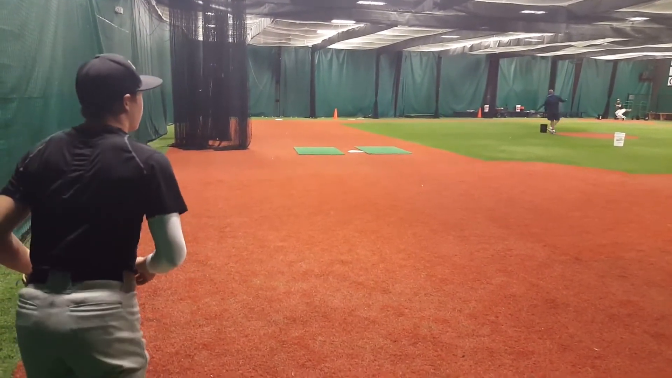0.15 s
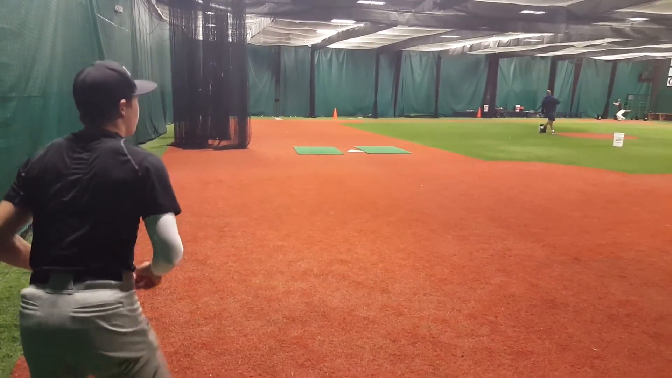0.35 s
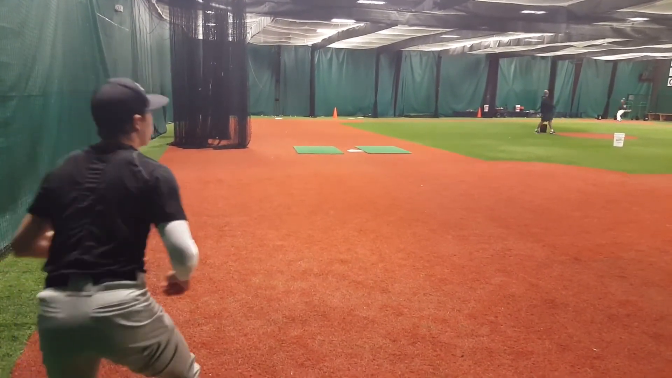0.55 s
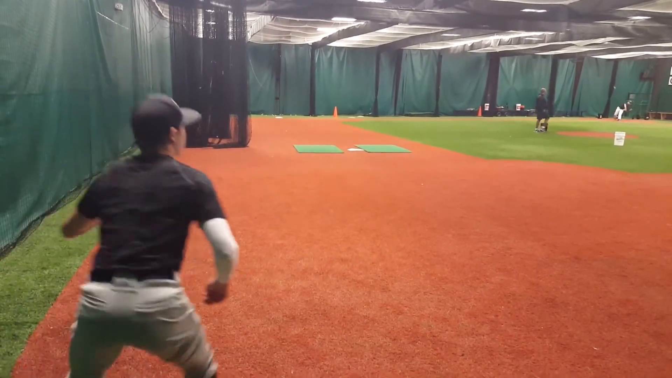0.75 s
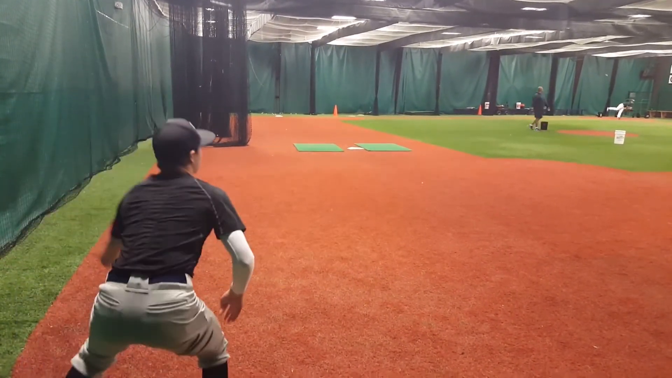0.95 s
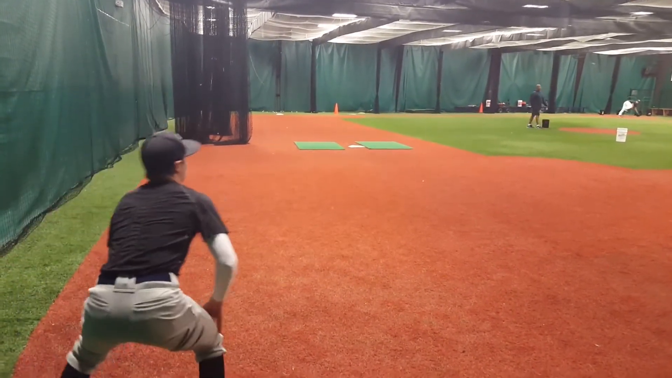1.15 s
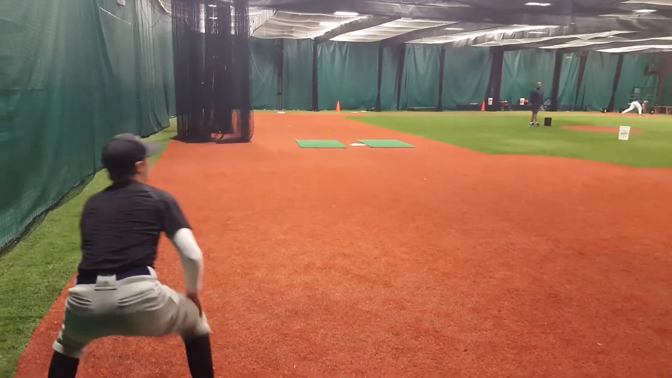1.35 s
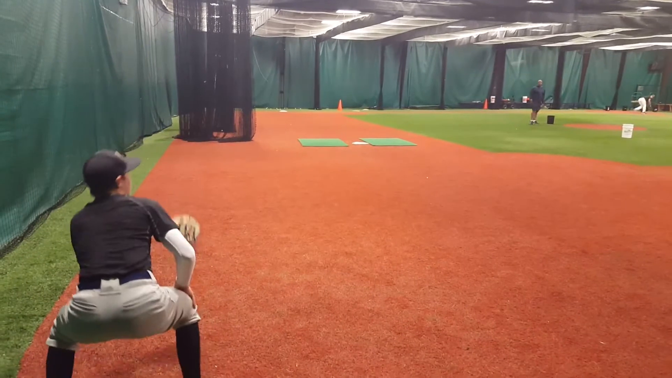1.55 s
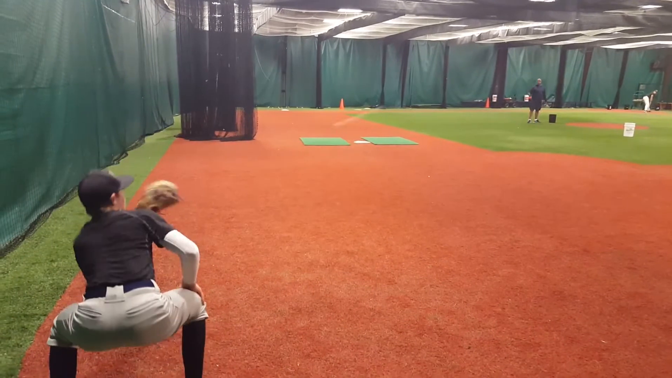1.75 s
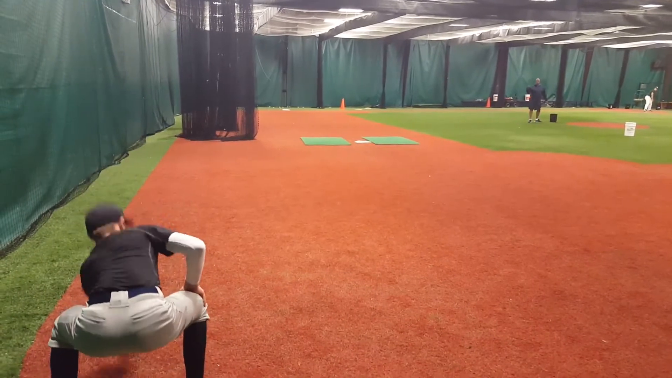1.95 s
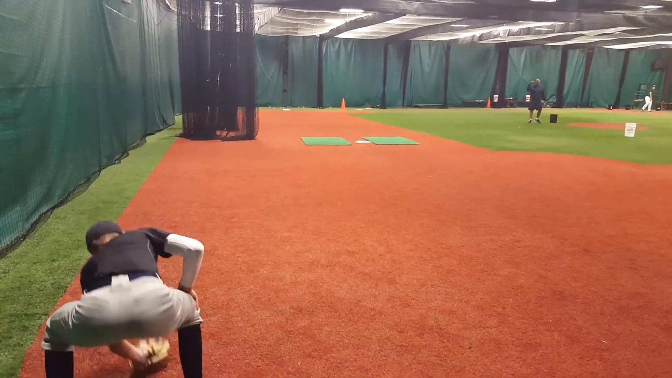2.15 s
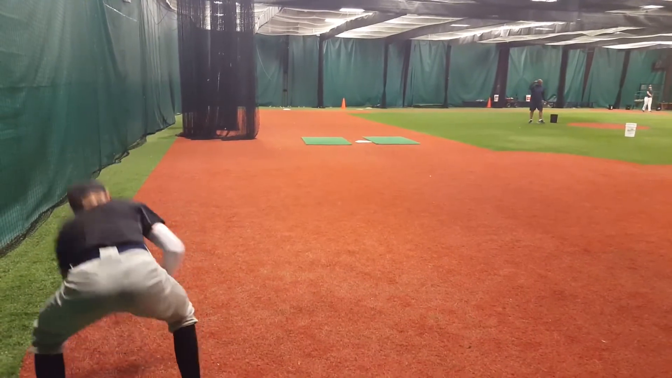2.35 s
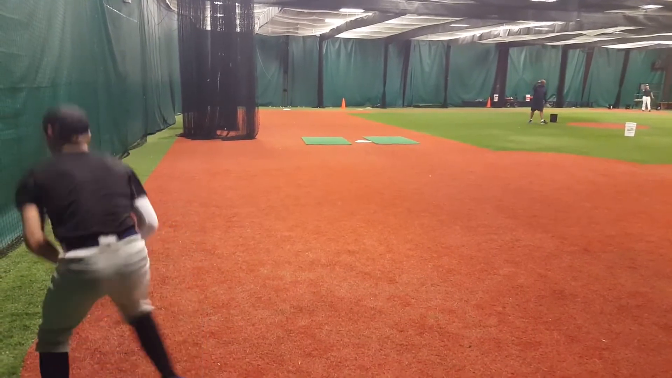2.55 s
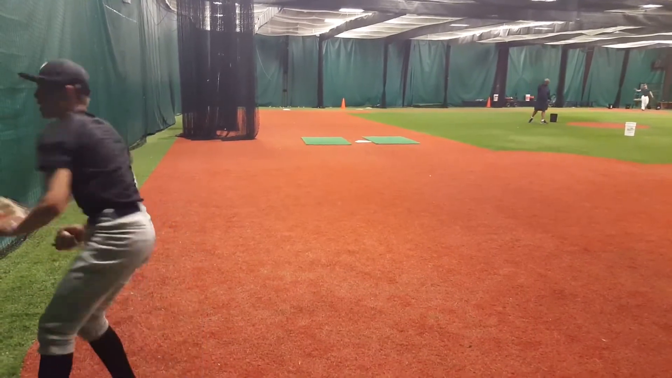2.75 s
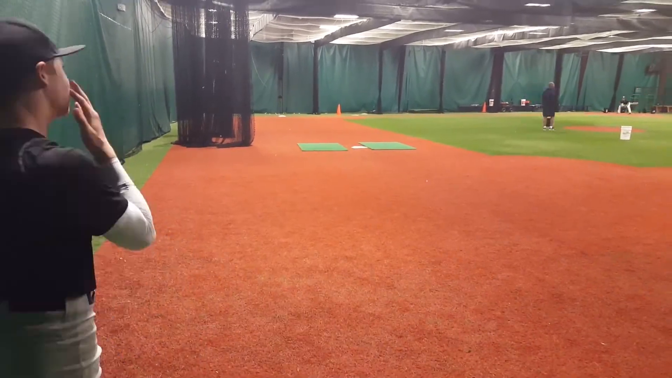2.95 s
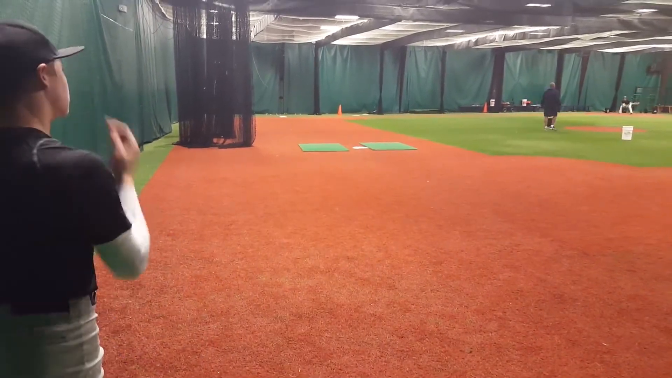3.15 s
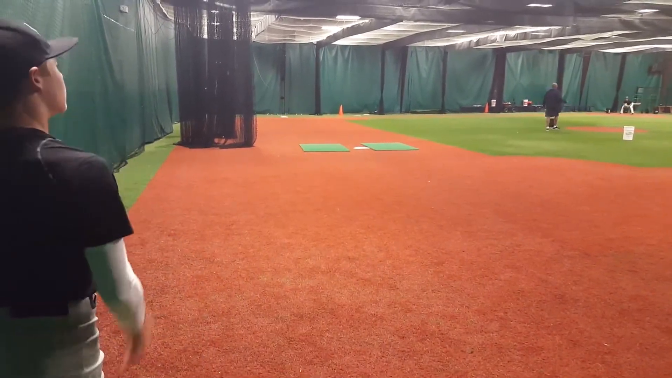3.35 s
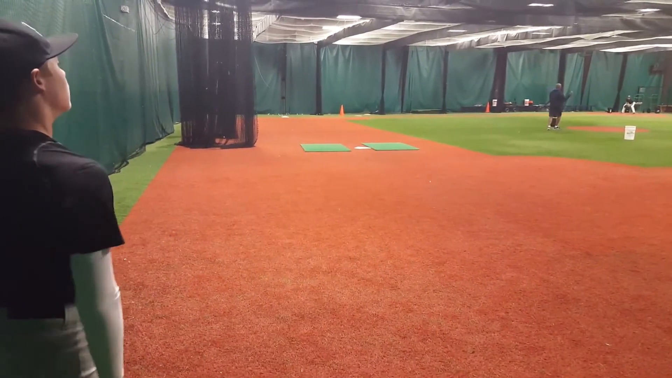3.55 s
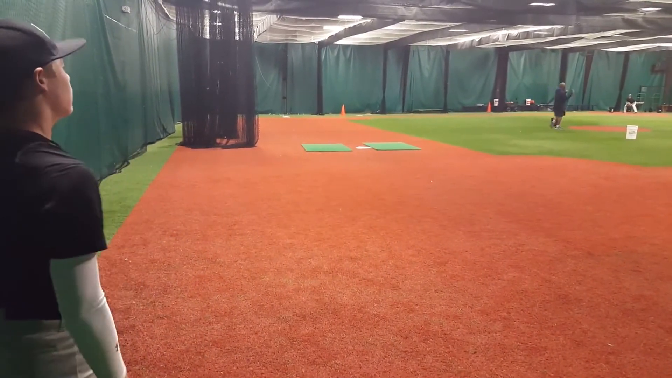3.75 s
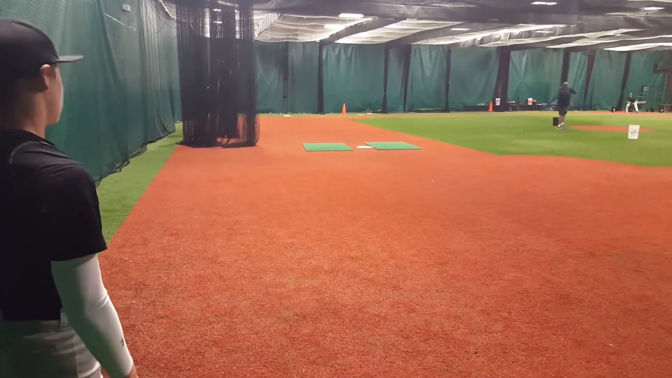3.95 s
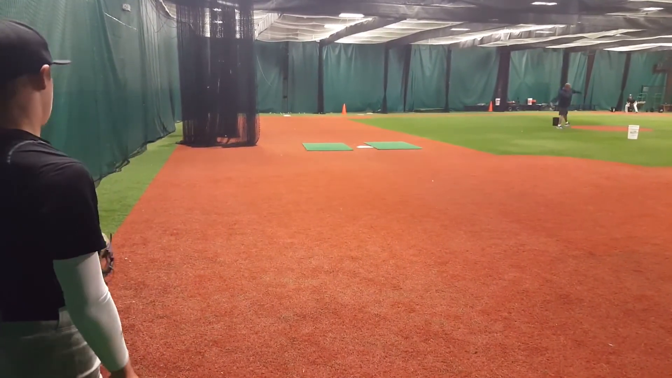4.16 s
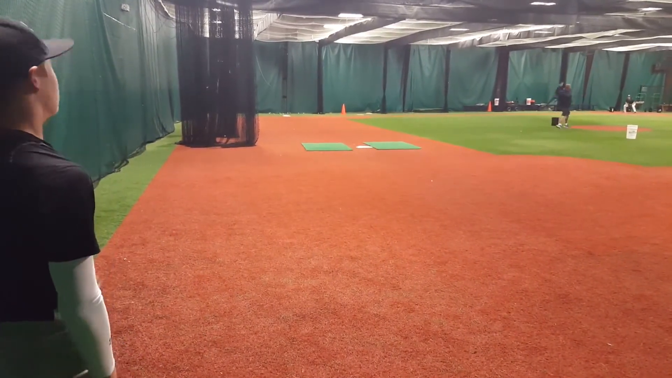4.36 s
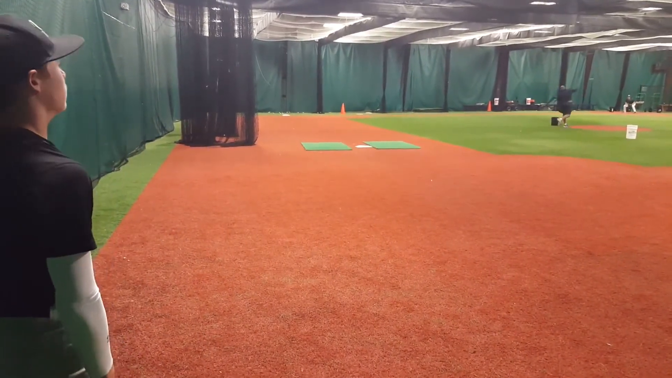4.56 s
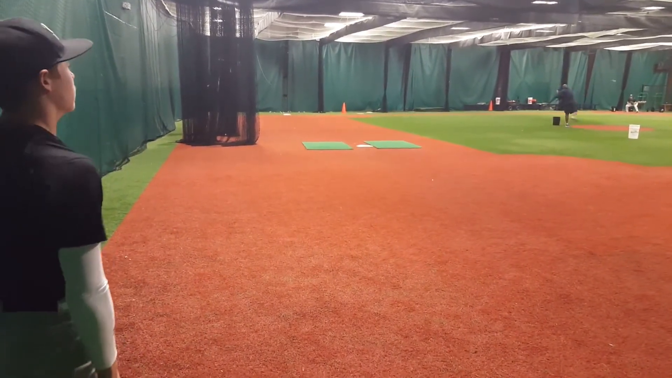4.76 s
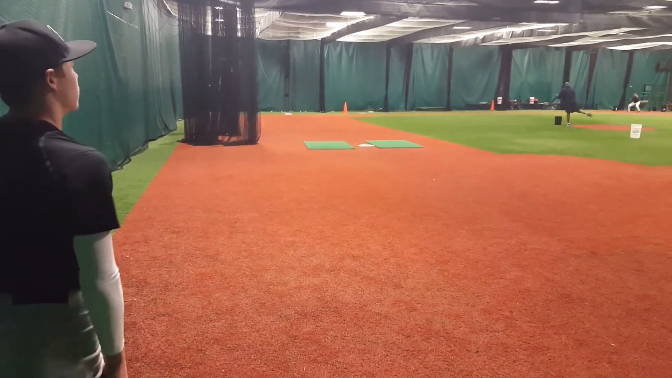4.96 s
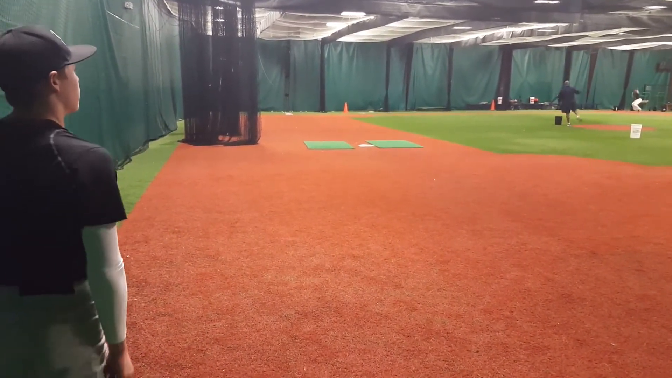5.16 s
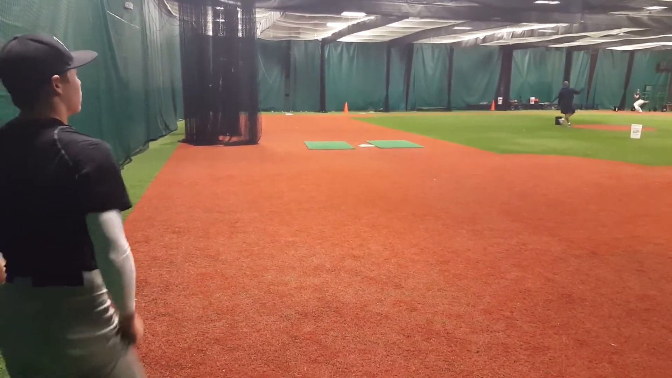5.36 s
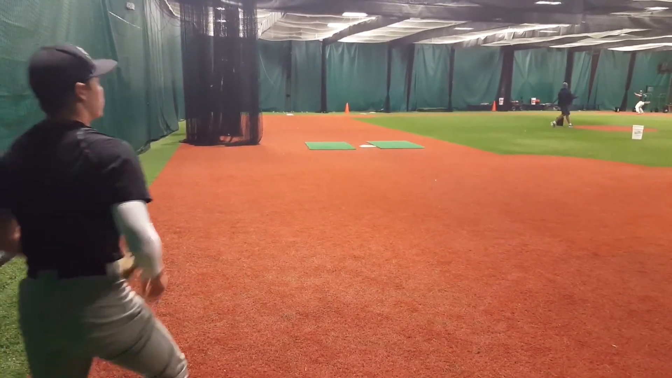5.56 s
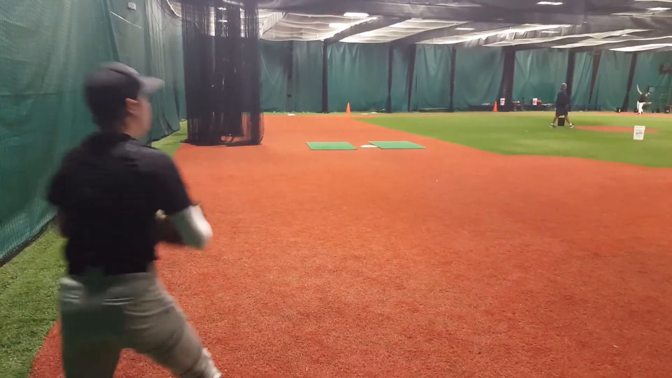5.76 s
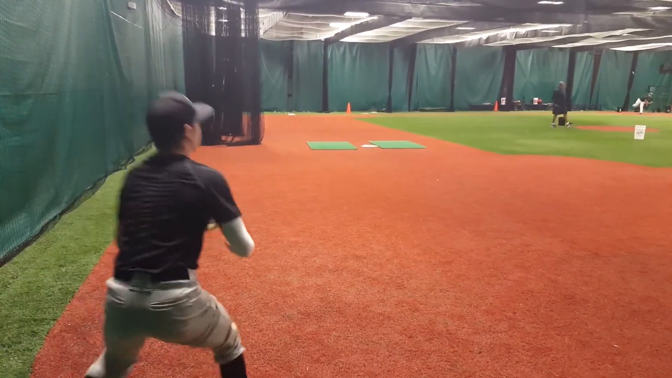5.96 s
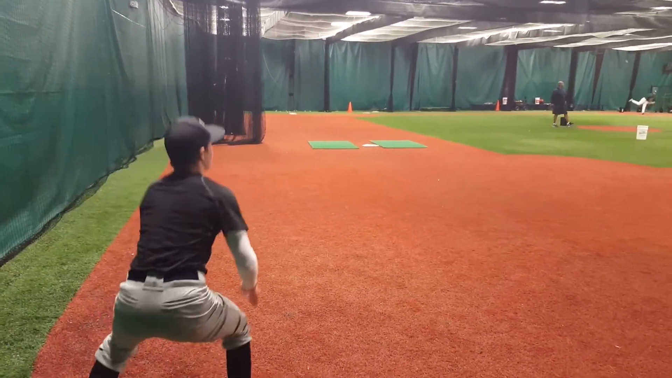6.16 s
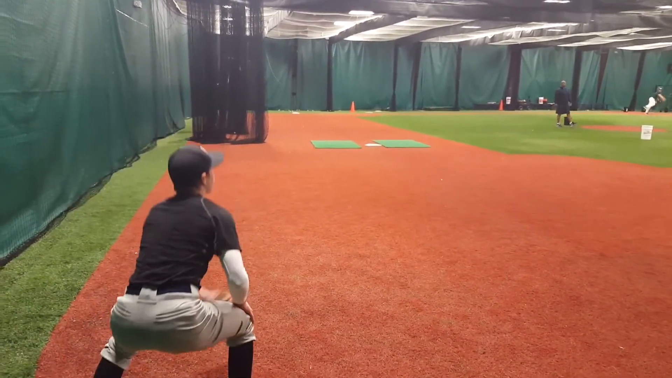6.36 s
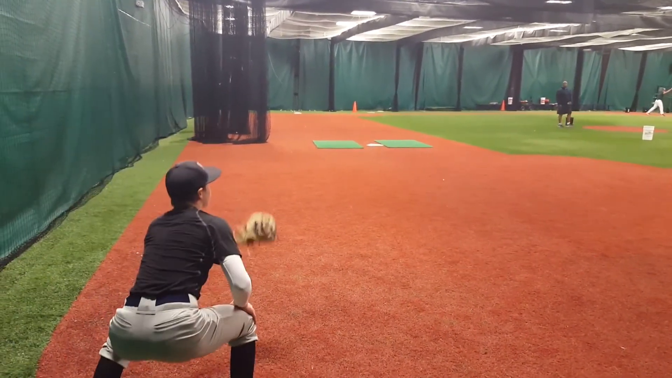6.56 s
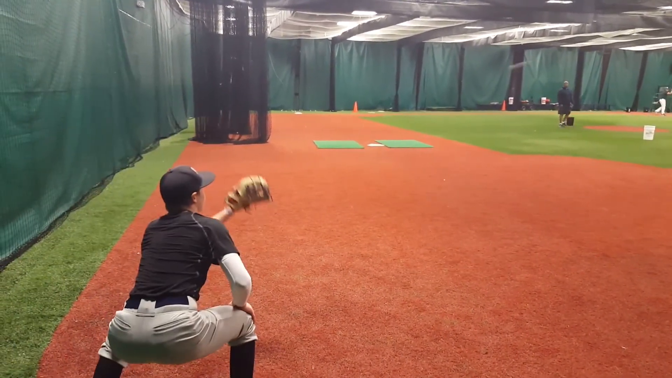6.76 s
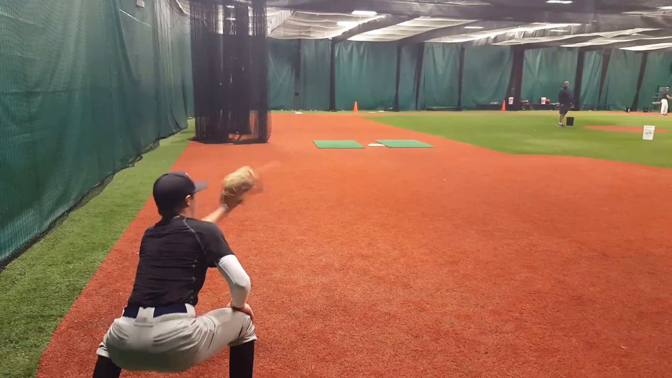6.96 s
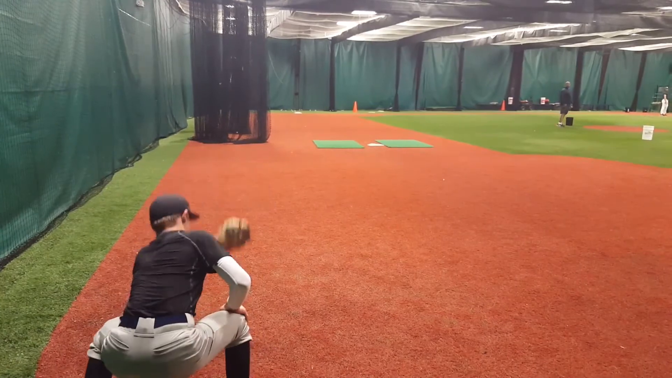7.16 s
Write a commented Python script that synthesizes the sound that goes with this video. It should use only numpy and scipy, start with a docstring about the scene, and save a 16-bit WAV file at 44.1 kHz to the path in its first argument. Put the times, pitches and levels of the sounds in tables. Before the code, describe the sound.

A baseball pops into leather mitts four times, near and far, echoing in a large hall with shoes scuffing turf and ventilation humming.

```python
"""A large indoor training hall, a stereo microphone close to a catcher. Ventilation hums throughout.
A pitch smacks into a leather mitt in the next lane; the pop fills the hall and comes off the walls.
The near catcher shuffles on the turf, then a ball hisses in and cracks close by, at about 2 s.
A low drone, perhaps an engine outside, climbs and settles. The next lane pops again just after 5 s;
more shuffling, a hand pats the mitt, and a last close pitch lands at about 7 s."""
import sys
import numpy as np
from scipy import signal
from scipy.fft import rfft, irfft, next_fast_len
from scipy.io import wavfile
from scipy.ndimage import uniform_filter1d

SR = 44100
rng = np.random.default_rng(int(sys.argv[2]) if len(sys.argv) > 2 else 0)


def unload_wav(signal):
    """Save mono or channel-first audio to the path in sys.argv[1] as 16-bit WAV at rate SR, clipped to [-1, 1]."""
    wavfile.write(
        sys.argv[1],
        SR,
        np.round(np.clip(np.atleast_2d(signal).T, -1, 1) * 32767).astype(np.int16),
    )


N = 317961
EAR_GAP_M, SOUND_M_PER_S = 0.15, 343

# Ball meeting mitt, next lane and close by in turn: (time [s], seating delay [s], folding delay [s],
# pocket pitch [Hz], first touch [dB], seating [dB], folding [dB], crack [dB], crack centre [Hz],
# high click [dB], palm thump [dB], lead of the left ear [ms])
CATCHES = [(.178, .0018, .0094, 996, -19, -10.5, -29, -15.5, 4660, -24, -38, -0.27),
           (1.943, .0036, .0092, 997, -12, 0, -3, -17, 4060, -8, -11.5, .22),
           (5.2429, 0.0046, 0.0088, 910, -23, -17, -25, -25, 3400, -45, -38, 0.18),
           (7.0843, 0.0016, .0066, 945, 0.5, -12, -10, -3, 5600, -0.5, -29, 0.087)]
# How each catch spreads through the hall: (early field [dB], late field [dB], early t60 [factor],
# late t60 [factor], ringing [dB], near wall delay [s], its sharp echo [dB], its smeared echo [dB],
# far wall echo [dB])
HALL_SPREAD = [(-23, -31.5, 0.65, 0.94, -30.5, 0.054, -11.5, -28.5, -35),
               (-15.5, -29.5, 0.8, 0.95, -26.5, .031, -15, -27.5, -32.5),
               (-24.5, -33, 0.53, 1, -33, .0432, -1, -27.5, -44.5),
               (-17, -28, 0.7, 0.39, -22, 0.029, -17.5, -21, -38)]
# The near catcher's shoes on turf:
# (time [s], thud [dB], thud pitch [Hz], scuff [dB], grit [dB], scuff t60 [s])
STEPS = [(.924, -43, 235, -86, -96, .3), (.975, -43, 202, -64, -80, 0.49), (1.38, -58, 196, -73, -79, .2),
         (1.497, -51, 203, -61, -63, 0.075), (1.572, -45, 118, -47, -61, 0.37),
         (2.62, -74, 200, -67, -60.5, 0.22), (2.792, -58, 271, -52, -54.5, 0.2),
         (2.82, -56, 270, -49.5, -65, 0.36), (4.697, -52, 196, -58.5, -65, 0.22),
         (4.771, -57, 196, -60.5, -65.5, 0.27), (5.514, -43.5, 162, -45, -63, 0.3),
         (5.833, -44.5, 270, -49, -59, 0.19), (5.977, -53, 150, -55, -56, 0.068),
         (6.254, -48, 254, -42.5, -56.5, 0.37)]


def amp(db):
    """Decibels to gain."""
    return 10 ** (np.asarray(db) / 20)


def unit(x):
    """Scales to an rms of one."""
    return x / np.sqrt(np.mean(x ** 2) + 1e-20)


def read(points, hz):
    """Reads a table on a log-frequency axis."""
    f, value = np.transpose(points)
    return np.interp(np.log(hz + 1), np.log(np.sort(f) + 1), value)


def add(mix, s, sound):
    """Mixes a stereo sound in at time s."""
    part = mix[:, max(round(s * SR), 0):][:, :sound.shape[1]]
    part += sound[:, :part.shape[1]]


def hump(hz, centre_hz, octaves):
    """Gain of a broad resonance."""
    return 1 / (1 + (np.log2((hz + 1) / centre_hz) / octaves) ** 2) ** 2


def waver(rate_hz):
    """A slow random wander of about unit size."""
    return np.interp(np.arange(N) / SR * rate_hz, np.arange(1024), rng.standard_normal(1024))


def swell(age, rise, fall):
    """A smooth bell that peaks at age zero, with its own rise and fall times."""
    return np.exp(-(age / np.where(age < 0, rise, fall)) ** 2)


def diffuse(gain, size):
    """Noise from all sides with the spectrum gain(hz): alike at both ears in the bass only."""
    hz = np.fft.rfftfreq(size, 1 / SR)
    mid, side = np.exp(2j * np.pi * rng.random((2, len(hz))))
    coherence = np.sinc(2 * hz * EAR_GAP_M / SOUND_M_PER_S)
    mid, side = mid * np.sqrt((1 + coherence) / 2), side * np.sqrt((1 - coherence) / 2)
    return unit(irfft(np.array([mid + side, mid - side]) * gain(hz), size))


def noise_floor(db=-57):
    """A steady low rumble and faint background hiss."""
    # (frequency [Hz], density [dB])
    floor_spectrum = [(20, -20.5), (45, -8.5), (95, 4), (160, -3.5), (280, -14), (450, -22.5), (900, -23.5),
                      (1600, -28), (3000, -33.5), (5500, -37), (9000, -42.5), (13500, -38), (14800, -67.5)]
    return amp(db) * diffuse(lambda hz: amp(read(floor_spectrum, hz)), next_fast_len(N))[:, :N]


def ventilation(waver_hz=1.3):
    """Fans hum on two wavering tones."""
    # (frequency [Hz], rms level [dB])
    fan_tones = [(360.7, -72.5), (839.8, -84.5)]
    return np.sqrt(2) * sum(amp(db) * np.sin(2 * np.pi * np.cumsum(hz + waver_hz * waver(16)) / SR)
                            for hz, db in fan_tones)


def drone(flutter_db=2):
    """A low tone, perhaps an engine outside, glides while it swells and fades."""
    # (peak time [s], rms level [dB], rise [s], fall [s], pitch at the peak [Hz],
    # glide before [Hz/s], glide after [Hz/s])
    drone_swells = [(0, -58, .1, .35, 131, 0, -30), (3.8, -51.5, .52, .36, 132.3, 36, 36),
                    (5.5, -53, .58, 1.6, 122, 13, -8)]
    out = np.zeros(N)
    for s, db, rise, fall, hz, glide_before, glide_after in drone_swells:
        age = np.arange(N) / SR - s
        turns = np.cumsum(hz + age * np.where(age < 0, glide_before, glide_after)) / SR
        out += amp(db + flutter_db * waver(22)) * swell(age, rise, fall) * np.sin(2 * np.pi * turns)
    return np.sqrt(2) * out


def soft_hiss(rest_db=-75, treble_hz=3000):
    """A soft background hiss swells and sinks, sometimes brighter."""
    # (frequency [Hz], density [dB])
    hiss_spectrum = [(60, -20), (280, 4.5), (500, -3.5), (1000, -5.5), (1500, -8), (2250, -9.5),
                     (3500, -14.5), (6100, -13.5), (8000, -28), (10000, -28), (13000, -23), (14800, -51)]
    # (peak time [s], level [dB], treble lift [dB], rise [s], fall [s])
    hiss_swells = [(.82, -56.5, 0.5, .35, 0.21), (1.5, -52.5, -2.5, 0.4, 0.31),
                   (2.901, -62.5, 0.5, 0.27, 0.084), (3.45, -68, 0, .3, .35), (4.58, -60.5, -5, .13, 0.58),
                   (6.0, -55, -2, 0.39, 0.12), (6.35, -62, 1.5, 0.26, 0.27), (7.1, -62, -0.5, 0.58, .2)]
    t = np.arange(N) / SR
    hiss = diffuse(lambda hz: amp(read(hiss_spectrum, hz)), next_fast_len(N))[:, :N]
    treble = signal.sosfiltfilt(signal.butter(2, treble_hz, "high", fs=SR, output="sos"), hiss)
    body_power = treble_power = amp(rest_db) ** 2
    for s, db, lift_db, rise, fall in hiss_swells:
        power = (amp(db) * swell(t - s, rise, fall)) ** 2
        body_power = body_power + power
        treble_power = treble_power + power * amp(lift_db) ** 2
    return np.sqrt(body_power) * (hiss - treble) + np.sqrt(treble_power) * treble


def boom(db, pitch_hz, t60, pan_db, rise_s=0.00081):
    """A soft low blow, blurred by the hall."""
    t = np.arange(2 ** 14) / SR
    noise = diffuse(lambda hz: hump(hz, pitch_hz, octaves=1), len(t)) * amp([[0], [-pan_db]])
    return noise * amp(db - 60 * t / t60) * (1 - np.exp(-t / rise_s))


def puffs():
    """Low puffs of air right at the microphone, mostly on the left."""
    # (time [s], level [dB], pitch [Hz], t60 [s], left over right [dB])
    air_puffs = [(0.382, -47, 60.4, 0.37, 23), (7.089, -22.5, 99, 0.071, 13)]
    out = np.zeros((2, N))
    for s, *puff in air_puffs:
        add(out, s, boom(*puff))
    return out


def thuds(weight_lag_s=.01):
    """The catcher's weight lands on the floor just after the sole touches."""
    out = np.zeros((2, N))
    for s, db, pitch_hz, *_ in STEPS:
        add(out, s + weight_lag_s, boom(db, pitch_hz, t60=0.4, pan_db=0.4))
    return out


def scuffs(press_s=.011, body_hz=950, grit_hz=5500, fizz_hz=12000, grain_db=4.0):
    """Near the microphone a sole presses the turf and its grains crunch."""
    out, t = np.zeros((2, N)), np.arange(2 ** 14) / SR
    for s, _, _, body_db, grit_db, t60 in STEPS:
        press = np.minimum(t / press_s, 1) * amp(-60 * np.maximum(t - press_s, 0) / t60)
        roughness = unit(uniform_filter1d(rng.standard_normal(len(t)), size=50))
        grains = unit(amp(grain_db * roughness))
        body = diffuse(lambda hz: hump(hz, body_hz, octaves=1.6), len(t))
        grit = diffuse(lambda hz: hump(hz, grit_hz, 0.91) + 0.86 * hump(hz, fizz_hz, 0.28), len(t))
        add(out, s, press * (amp(body_db) * body + amp(grit_db) * grit * grains))
    return out


def ringing(modes, t):
    """Dying notes that reach the two ears slightly apart; the strongest starts at one."""
    top_db = max(db for _, db, _ in modes)
    lags = rng.uniform(-1, 1, (len(modes), 2, 1)) * EAR_GAP_M / SOUND_M_PER_S / 2
    return sum(amp(db - top_db - 60 * t / t60) * np.sin(2 * np.pi * hz * (t + lag))
               for (hz, db, t60), lag in zip(modes, lags))


def uneven(tone, hz, ripple_db=1.2):
    """A spectrum with the small peaks and dips that crossing reflections leave in it."""
    ripple = np.interp(hz, np.linspace(0, SR / 2, 256), rng.standard_normal(256))
    return amp(read(tone, hz) + ripple_db * ripple)


def reverberation(hz, t, spread, sheen_db=3, sheen_fade_db_per_s=45, wall_bass_hz=170,
                  scatter_s=.007, far_wall_s=0.22, air_loss_db_per_s=110):
    """Power by frequency and age of a quick nearby wash, a long tail and two smeared wall echoes."""
    # Decay of the nearby space and of the whole hall: (frequency [Hz], t60 [s])
    early_t60 = [(80, 0.39), (300, .4), (1000, 0.6), (3000, 0.57), (6000, 0.49), (12000, 0.77)]
    late_t60 = [(80, 1.1), (300, 1.22), (900, 1.88), (2400, 1.78), (4000, 1.32), (6500, 1), (9000, 0.25),
                (14000, 1.9)]
    early_db, late_db, early_factor, late_factor, _, wall_s, _, near_db, far_db = spread
    treble = (hz / (SR / 4)) ** 2
    sheen = np.minimum(treble, 1) * (sheen_db - sheen_fade_db_per_s * t)
    early = amp(early_db - 60 * t / (early_factor * read(early_t60, hz)) + sheen)
    late = amp(late_db - 60 * t / (late_factor * read(late_t60, hz)))
    power = early ** 2 + late ** 2
    returned = hz ** 2 / (hz ** 2 + wall_bass_hz ** 2)  # curtained walls let the bass through
    for delay, db, smear_s in [(wall_s + scatter_s, near_db, 0.011), (far_wall_s, far_db, 0.042)]:
        echo = amp(db - air_loss_db_per_s * delay * treble)  # a longer path loses more treble
        power += returned * echo ** 2 * np.exp(-((t - delay) / smear_s) ** 2)
    return power


def hall(lag_s=.002, build_s=.0045, clump_db=1.0, low_cut_hz=60):
    """The hall answers each catch from all sides with reverberation and hollow notes."""
    # Tone of the hall, one list a catch: (frequency [Hz], density [dB])
    hall_tones = [
        [(45, 1), (95, 1), (140, -14), (190, 1.5), (290, -11), (360, -7.5), (450, -11), (760, -5.5),
         (1100, -8.5), (1350, -16), (2900, -19), (6000, -22.5), (8000, -32.5), (14000, -49)],
        [(45, -29.5), (110, -7), (250, -7), (450, -7.5), (620, -10.5), (1030, -3.5), (1400, -8), (2250, -8.5),
         (3200, -18.5), (3800, -22), (5600, -20), (8000, -36), (11500, -38), (14500, -52.5)],
        [(50, -34.5), (105, -2.5), (185, 1), (330, -14), (430, -9.5), (880, -6), (1280, -14.5), (1570, -11),
         (2100, -17), (2650, -16.5), (4000, -22), (6200, -23.5), (8000, -37.5), (14000, -50.5)],
        [(50, -47), (150, -11), (330, -5), (580, -5.5), (880, 0), (1400, -4.5), (2000, -8), (2700, -12),
         (3700, -9), (6400, -14), (7600, -26), (12200, -30), (15000, -40)],
    ]
    # Notes that ring on, one list a catch: (frequency [Hz], relative level [dB], t60 [s])
    hollow_notes = [
        [(187, -1, 0.45), (226, -6, 0.44), (359, 0, 0.24), (733, -8, 0.31), (1160, -30, 0.25)],
        [(248.5, -2, 0.19), (459, 3, 0.45), (525, -6, 0.28), (948, -3.5, 0.74), (995, -4, 0.4),
         (1630, -9.5, .5), (1949.5, -3, 1)],
        [(187.8, 1, 0.26), (907, -10, .39), (1050, -16, 0.42), (1566, 6.5, 0.25), (2520, 5.5, 0.25)],
        [(320.7, 4.5, 0.27), (836, -3.5, 0.85), (870, -2, 0.35), (1423, -9, 0.32), (1780, 0, 0.12),
         (2028, 6, 0.14)],
    ]
    out, size = np.zeros((2, N)), 2 ** 16
    age = np.arange(size) / SR
    for (s, *_), spread, tone, modes in zip(CATCHES, HALL_SPREAD, hall_tones, hollow_notes):
        field = diffuse(lambda f: uneven(tone, f) * f ** 2 / (f ** 2 + low_cut_hz ** 2), size)
        hz, t, frames = signal.stft(field, SR, nperseg=256)
        decay = np.sqrt(reverberation(hz[:, None], t, spread))
        clumps = amp(clump_db * rng.standard_normal(len(t)))  # reflections arrive in bunches
        tail = signal.istft(frames * decay * clumps, SR, nperseg=256)[1][:, :size]
        ring_db = spread[4]
        notes = amp(ring_db) * ringing(modes, age)
        add(out, s + lag_s, (tail + notes) * (1 - np.exp(-age / build_s)))
    return out


def flights(fade_in_s=.45, nearing_s=.3):
    """A spinning ball hisses louder as it nears the microphone, and stops in the mitt."""
    # The two close pitches: (arrival time [s], level on arrival [dB])
    arrivals = [(1.945, -60.5), (7.086, -64)]
    # Hiss of the seams: (frequency [Hz], density [dB])
    seam_spectrum = [(100, -24), (1500, -5), (5000, 1), (8000, -4.5), (12500, -1.5), (14800, -25.5)]
    out, to_go = np.zeros((2, N)), np.arange(2 ** 15)[::-1] / SR
    for s, db in arrivals:
        level = amp(db) * np.exp(-(to_go / fade_in_s) ** 2) / (1 + to_go / nearing_s)
        add(out, s - to_go[0], level * diffuse(lambda hz: amp(read(seam_spectrum, hz)), len(to_go)))
    return out


def contact(lead_ms, attack_s=0.00073):
    """Time since a contact at each ear, and its quick onset."""
    age = np.maximum(np.arange(2048) / SR - np.array([[0], [lead_ms / 1000]]), 0)
    return age, 1 - np.exp(-(age / attack_s) ** 2)


def pocket(db, pocket_hz, lead_ms):
    """The struck pocket of the mitt rings for a few cycles."""
    # (frequency [multiple of the pocket pitch], level [dB], t60 [s])
    mitt_modes = [(.3, -12.5, 0.024), (.8, -24, .012), (1, 0.5, 0.018), (1.35, -10, 0.017),
                  (1.95, -4.5, 0.013)]
    age, onset = contact(lead_ms)
    return -onset * sum(amp(db + mode_db - 60 * age / t60) * np.sin(2 * np.pi * pocket_hz * ratio * age)
                        for ratio, mode_db, t60 in mitt_modes)


def crack(db, centre_hz, lead_ms, t60=0.011, octaves=0.51):
    """A short, bright burst of noise as the leather is struck."""
    age, onset = contact(lead_ms)
    noise = diffuse(lambda hz: hump(hz, centre_hz, octaves), age.shape[1])
    return onset * amp(db - 60 * age / t60) * noise


def catch(seat_s, fold_s, hz, touch_db, seat_db, fold_db, crack_db, crack_hz, click_db, palm_db, lead_ms,
          seat_crack_db=-4.5, fold_crack_db=-5.5, fold_ratio=1.35,
          click_hz=11220, palm_s=.014, palm_ratio=0.61):
    """The ball touches and seats, the mitt folds with a brief, very high click, and the palm thumps."""
    out = np.zeros((2, 4096))
    add(out, 0, pocket(touch_db, hz, lead_ms) + crack(crack_db, crack_hz, lead_ms))
    add(out, seat_s, pocket(seat_db, hz, lead_ms) + crack(crack_db + seat_crack_db, crack_hz, lead_ms))
    add(out, fold_s, pocket(fold_db, hz * fold_ratio, lead_ms))
    add(out, fold_s, crack(crack_db + fold_crack_db, crack_hz, lead_ms))
    add(out, fold_s, crack(click_db, click_hz, lead_ms, t60=0.006, octaves=0.34))
    add(out, seat_s + palm_s, pocket(palm_db, hz * palm_ratio, lead_ms))
    return out


def mitts(pat_hz=1030, pat_crack_hz=5270, pat_lead_ms=0.18):
    """Each catch, heard direct and sharply off the near wall, and the pats of a hand."""
    # A hand patting the mitt: (time [s], pocket [dB], crack [dB])
    hand_pats = [(5.843, -24, -36.5), (5.8539, -33, -36)]
    out = np.zeros((2, N))
    for (s, *blow), (*_, wall_s, sharp_db, _, _) in zip(CATCHES, HALL_SPREAD):
        pop = catch(*blow)
        add(out, s, pop)
        add(out, s + wall_s, amp(sharp_db) * pop)
    for s, db, crack_db in hand_pats:
        add(out, s, pocket(db, pat_hz, pat_lead_ms) + crack(crack_db, pat_crack_hz, pat_lead_ms))
    return out


def ports(x, top_hz=14300):
    """The two microphone ports colour left and right differently; both fade in the top treble."""
    # (frequency [Hz], left over right [dB])
    port_balance = [(100, 3), (500, 1.5), (1100, 1.5), (2000, -3), (3400, 0), (5700, -6.5), (7200, -1),
                    (9800, 18), (14000, 9.5)]
    size = next_fast_len(N + 1024)
    hz = np.fft.rfftfreq(size, 1 / SR)
    ratio = amp(read(port_balance, hz))
    gain = np.array([ratio, np.ones_like(ratio)]) / np.sqrt((1 + ratio ** 2) / 2)  # keeps total power
    return irfft(rfft(x, size) * gain / (1 + (hz / top_hz) ** 20), size)[:, :N]


def scene(lean_db=1):
    """The practice as it reaches the microphone, over a background that leans slightly left."""
    practice = ports(mitts() + hall() + flights() + scuffs() + thuds() + puffs() + soft_hiss())
    return practice + (noise_floor() + ventilation() + drone()) * amp([[lean_db], [-lean_db]])


def record(dry, ceiling=.9, edge_hz=16600):
    """The loudest pop overloads the microphone; a steep low-pass limits the band."""
    clipped = dry / (1 + (dry / ceiling) ** 8) ** (1 / 8)
    low_pass = signal.firwin(255, edge_hz, window=("kaiser", 9), fs=SR)
    return signal.oaconvolve(clipped, low_pass[None], "same")


dry = scene()
out = record(dry)
unload_wav(out)
```